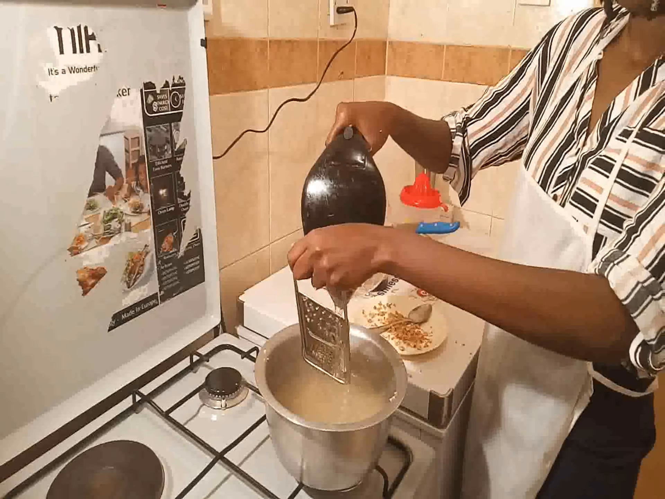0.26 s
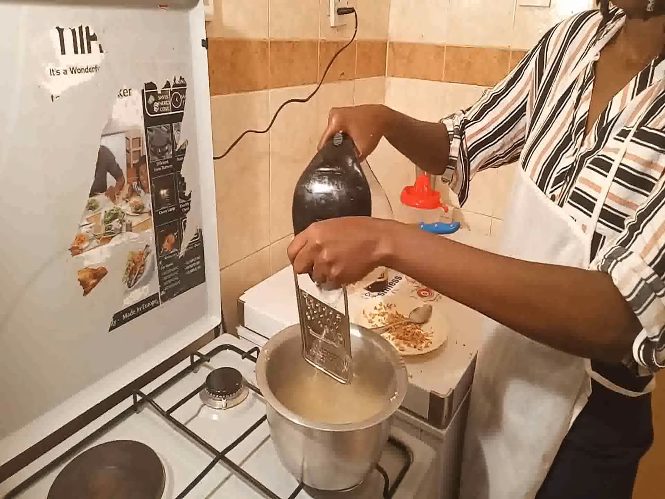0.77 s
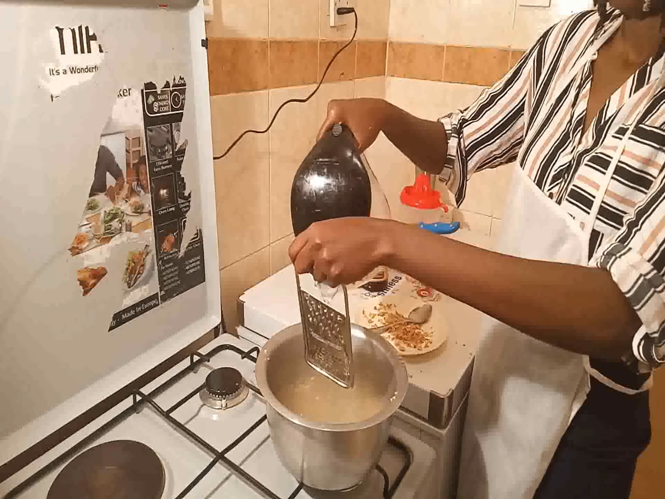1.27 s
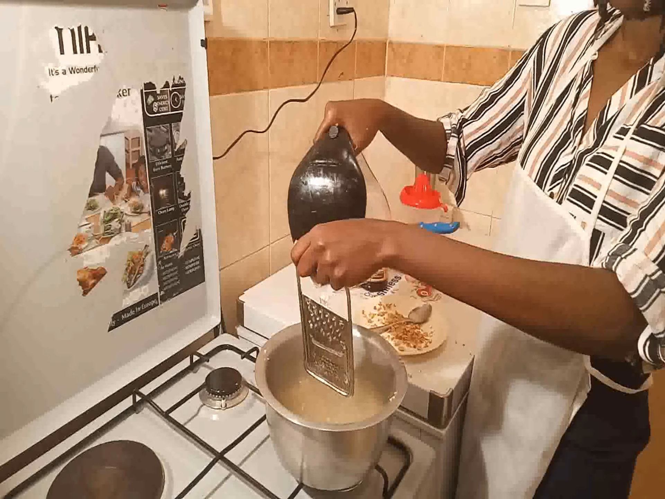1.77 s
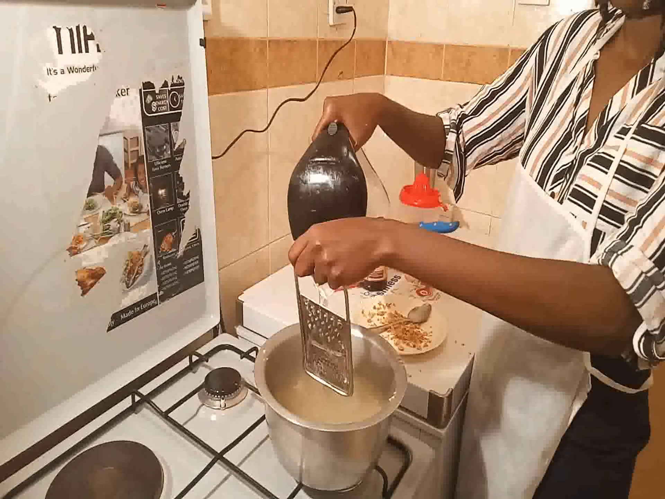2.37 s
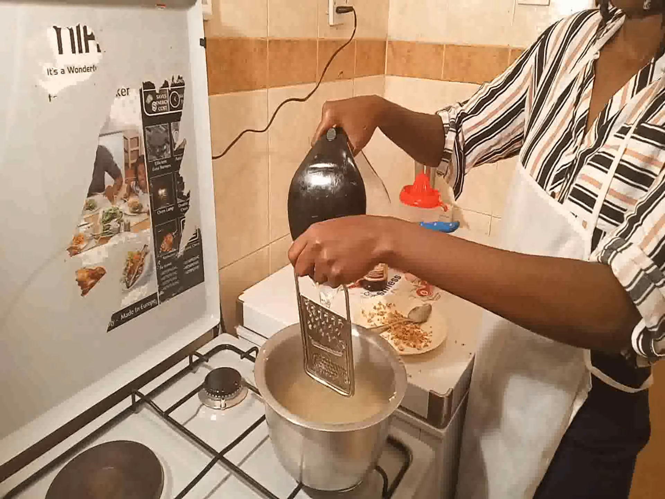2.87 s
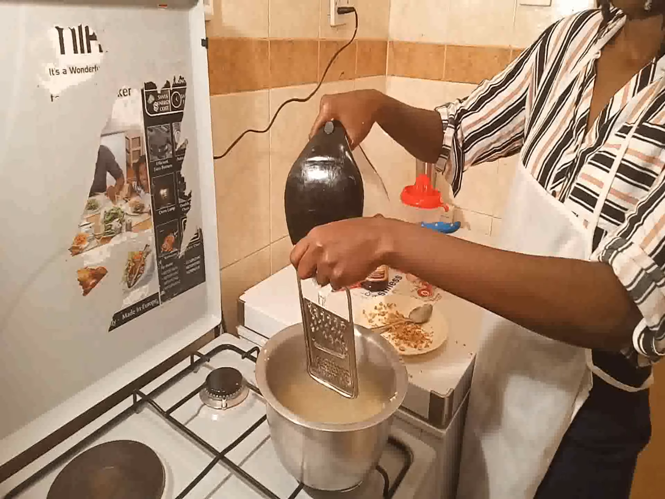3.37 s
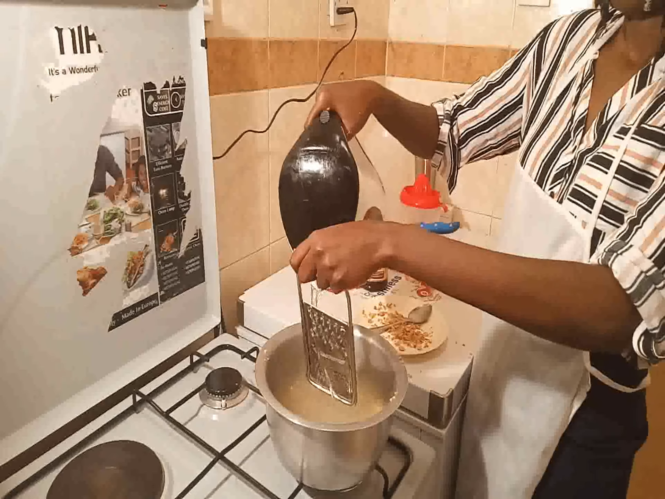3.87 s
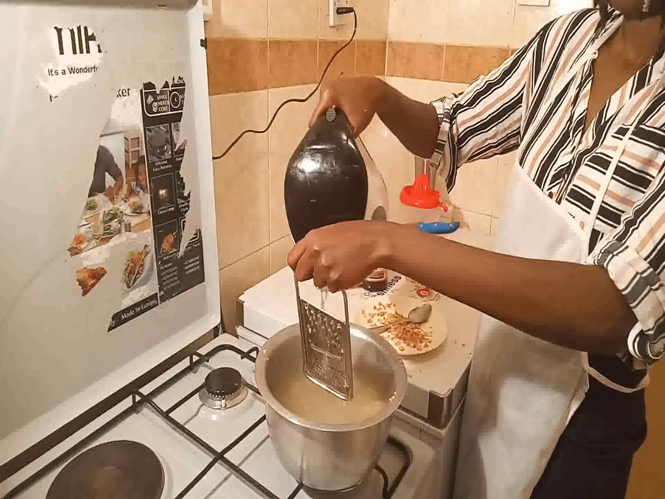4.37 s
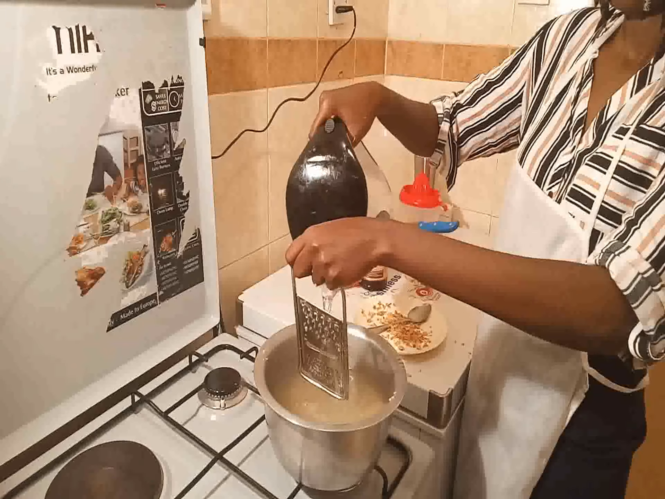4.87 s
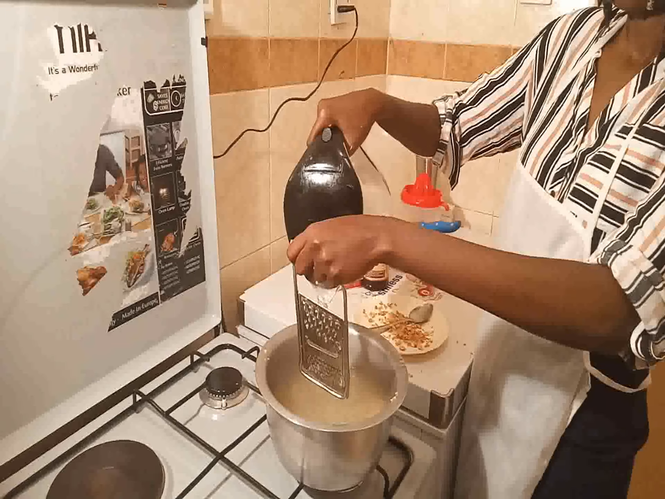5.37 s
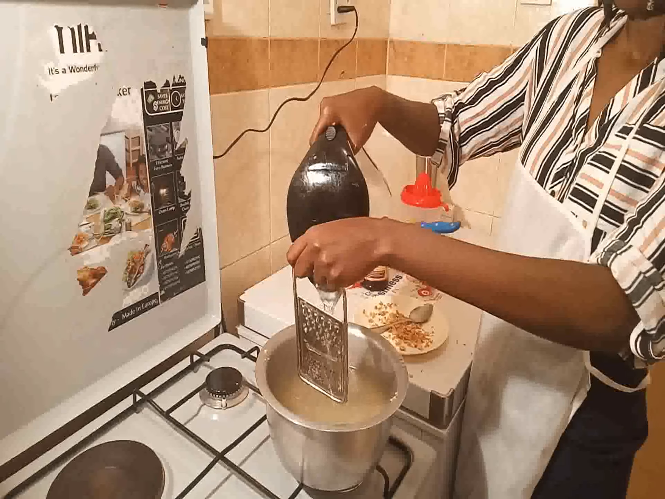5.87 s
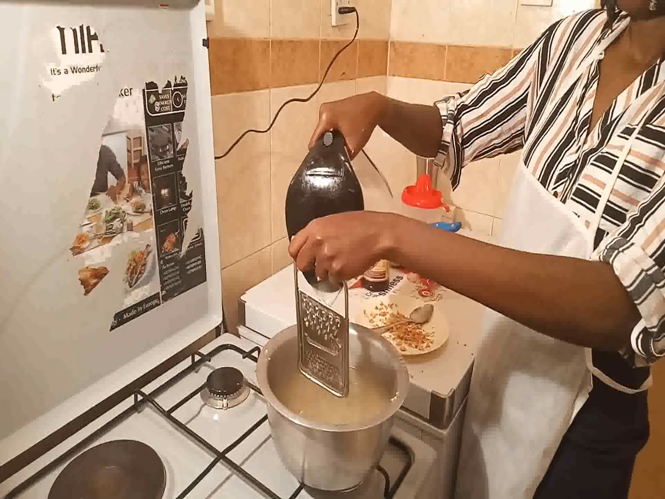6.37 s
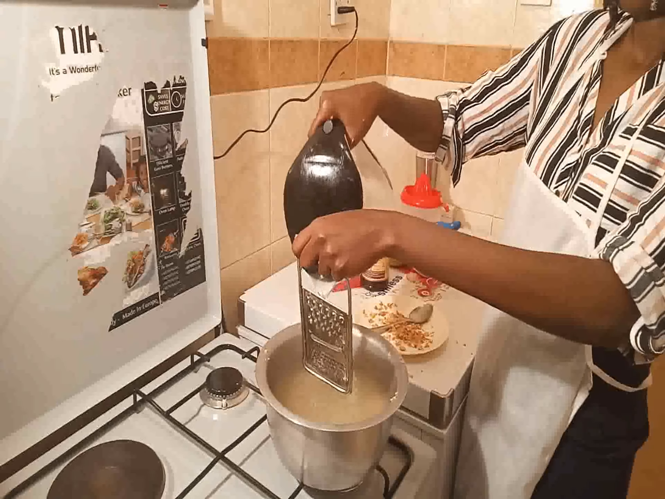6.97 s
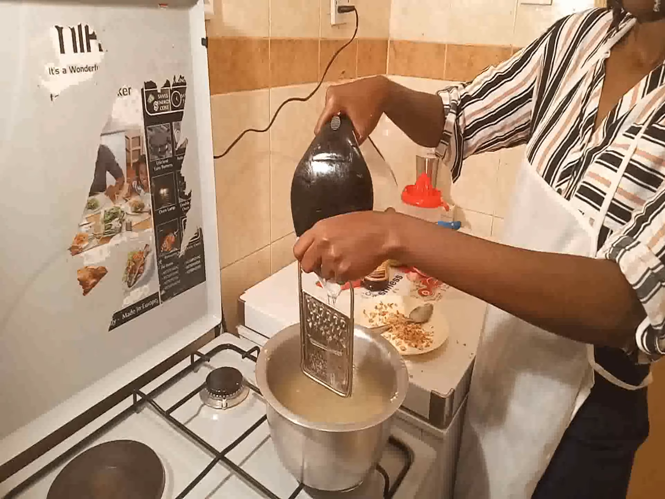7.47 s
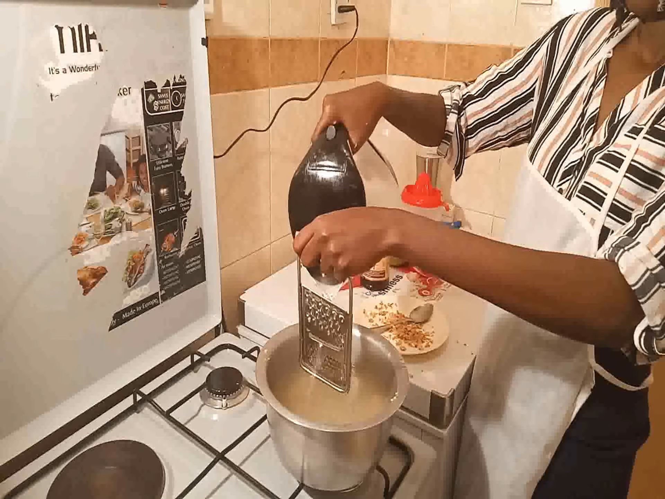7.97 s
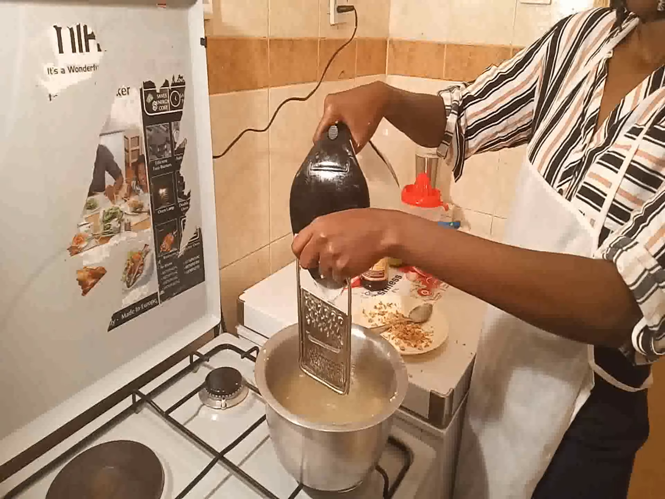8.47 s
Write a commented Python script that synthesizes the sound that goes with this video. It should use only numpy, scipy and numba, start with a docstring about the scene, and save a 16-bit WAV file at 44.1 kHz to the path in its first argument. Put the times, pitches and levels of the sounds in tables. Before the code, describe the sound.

In a small tiled kitchen, water from an upturned bottle runs down a metal grater into a half-full pot. It starts busy, with dense gurgling bubbles and splashes, then comes in irregular slugs separated by brief lulls, growing sparser toward the end. Drops tick sharply and the pot rings briefly. A close, dull phone microphone adds a low wavering rumble and thin hiss.

```python
"""A small tiled kitchen: water glugs from an upturned bottle, trickles down a grater and drops into a half-full
metal pot. Trapped bubbles are short sines gliding upwards; some run together as gurgles whose pitch slides.
Swarms of small bubbles and a crackle of spray swell with each slug of water; single drops tick sharply. Pot
modes, tile echo and singing notes ring on, over a wavering rumble and a thin hiss. A dull phone microphone
colours it all, a noise suppressor trims the tails and the top is cut."""
import sys
import numpy as np
from scipy import signal
from scipy.fft import rfft, irfft, next_fast_len
from scipy.io import wavfile
from scipy.ndimage import uniform_filter1d
from numba import njit

SR = 44100
rng = np.random.default_rng(int(sys.argv[2]) if len(sys.argv) > 2 else 0)


def unload_audio(sound):
    """Save the sound as a 16-bit wav file, at the path given as the first command line argument."""
    columns = np.transpose(np.atleast_2d(sound))
    # keep every value between -1 and 1, then stretch to whole-number steps
    steps = np.round(np.clip(columns, -1, 1) * 32767)
    wavfile.write(sys.argv[1], SR, steps.astype(np.int16))


N = 385345  # length in samples

# response of the phone microphone: (frequency [Hz], level [dB])
MICROPHONE = [(100, -1.5), (3500, 12), (4400, 7), (5500, -2), (7000, -1.5), (9500, -12.5), (12000, -17.5),
              (12500, -23)]

BUBBLE_GLIDE = 0.0012  # fraction by which the pitch rises per cycle
BUBBLE_RISE_CYCLES = 0.47  # time constant of the swell
LARGEST_DB = 12  # ceiling on the random sizes of small bubbles and spray


def undb(db):
    """Turn decibels into an amplitude factor."""
    return 10 ** (np.asarray(db) / 20)


def level(x, db):
    """Set the RMS level of a sound."""
    return x * undb(db) / np.sqrt(np.mean(x ** 2))


def read(points, hz):
    """Read a spectrum in dB at given frequencies, straight lines over log frequency."""
    at, db = np.transpose(points)
    return np.interp(np.log(np.maximum(hz, 1)), np.log(at), db)


def colour(x, points):
    """Weight a sound by a spectrum."""
    size = next_fast_len(N + 4096)
    hz = np.arange(size // 2 + 1) * SR / size
    weighted = rfft(x, size) * undb(read(points, hz))
    return irfft(weighted, size)[..., :N]


def highpass(x, order, hz):
    """Remove what lies below a frequency."""
    return signal.sosfilt(signal.butter(order, hz, "high", fs=SR, output="sos"), x)


def walk(rate):
    """Random levels, `rate` new ones per second, slewed from one to the next; spread near 1."""
    hold = int(SR / rate)
    steps = np.repeat(rng.standard_normal(N // hold + 1), hold)
    return uniform_filter1d(steps, hold)[:N] / np.sqrt(2 / 3)


@njit
def plink(s, size, hz, cycles, glide, rise):
    """Decaying sines that swell at once; a bubble's pitch glides up as it nears the surface.

    The amplitude falls by e every cycles / 2 turns, while the swell takes `rise` turns.
    """
    out = np.zeros(N)
    for k in range(len(s)):
        turn = -(s[k] * SR % 1) * hz[k] / SR  # phase in cycles, starting between samples
        step = hz[k] / SR
        for i in range(int(s[k] * SR) + 1, N):
            turn += step
            step = min(step * (1 + glide * step), .4)
            swell = 1 - np.exp(-turn / rise)
            decay = np.exp(-2 * turn / cycles[k])
            out[i] += size[k] * swell * decay * np.sin(2 * np.pi * turn)
            if turn > 3.5 * cycles[k]:
                break
    return out


def wavering_rumble():
    """Low noise that follows a drawn level curve and wavers at random on top."""
    # spectrum of the rumble, as density: (frequency [Hz], level [dB])
    rumble_colour = [(25, -32), (60, -13.5), (100, 0.5), (130, 2.5), (180, -7.5), (250, -23.5), (600, -38),
                     (2000, -84)]
    # swells and dips before the microphone: (time [s], level [dB])
    rumble_curve = [(0.0, -52.5), (0.41, -65), (0.44, -69), (0.51, -57.5), (2.11, -59), (2.29, -72),
                    (2.46, -61), (2.55, -83), (2.82, -61.5), (2.97, -69), (3.02, -58), (3.11, -66.5),
                    (3.53, -54.5), (3.62, -90), (3.72, -56.5), (3.89, -80), (3.94, -60), (4.62, -63),
                    (5.28, -57.5), (5.47, -71), (6.33, -59.5), (6.38, -53), (6.47, -71), (6.57, -59),
                    (6.64, -79), (6.84, -58), (6.89, -74.5), (7.96, -60), (8.18, -73), (8.74, -58)]
    flicker_db = 1.2
    waver = undb(flicker_db * walk(16))
    s, db = np.transpose(rumble_curve)
    curve_db = np.interp(np.arange(N) / SR, s, db)
    rumble = colour(rng.standard_normal(N), rumble_colour) * waver
    return level(rumble, 0) * undb(curve_db)


def steady_rumble():
    """Low noise at one constant level."""
    # spectrum of the rumble, as density: (frequency [Hz], level [dB])
    steady_colour = [(25, -8.5), (60, 3), (180, -6.5), (300, -10.5), (600, -13.5), (2000, -81)]
    return level(colour(rng.standard_normal(N), steady_colour), -66.5)


def hiss():
    """Thin noise whose level flickers at random."""
    # spectrum of the hiss, as density: (frequency [Hz], level [dB])
    hiss_colour = [(800, 3), (3000, -2), (8000, 0)]
    flicker_db = 1.5
    noise = colour(rng.standard_normal(N), hiss_colour)
    return level(noise * undb(flicker_db * walk(11)), -62.5)


def modes(t):
    """Decaying sines at the notes that pot and kitchen ring with, in random phase."""
    # modes, levels relative to each other: (frequency [Hz], level [dB], t60 [s])
    ring = [(364, -8.5, 0.96), (434, -17, 0.39), (523, -0.5, 0.83), (632.5, -4, 0.22), (662.4, 0.5, 0.33),
            (770, -1, 0.17), (795.3, 6.5, 0.16), (870, -10, 0.28), (960, 14, 0.28), (963, -16.5, 0.61),
            (1020, -0.5, 0.45), (1198, 1, 0.26), (1234, -6.5, 0.48), (1346, -22.5, 0.097), (1436, 1, 0.25),
            (1382, 15, 0.11), (1700, 16, 0.082), (1435, -24, 0.088), (1775, 7, 0.056), (1989, 3, 0.46),
            (2290, -5, 0.085), (2403, -14, 0.5), (2336, 7, 0.34), (2464, -1.5, 0.11), (2500, -4, 0.13),
            (3500, -17, 0.37), (583, 5.5, 0.38), (1110, -1, 0.62), (1301, 8, 0.16), (1446, -4, 0.45)]
    echo = 0
    for hz, db, t60 in ring:
        tone = np.sin(2 * np.pi * (hz * t + rng.random()))
        echo = echo + undb(db) * tone * 1000 ** (-t / t60)
    return level(echo, -7.5)


def tiles(t):
    """Dense echo of the tiled walls: bands of noise, each dying at its own pace."""
    # echo bands before the shared soft onset: (low [Hz], high [Hz], level [dB], t60 [s])
    tile_bands = [(229, 1240, -9, 0.45), (1370, 6360, -2, 0.32), (5050, 20400, -11, 0.22)]
    echo = 0
    for low_hz, high_hz, db, t60 in tile_bands:
        band_filter = signal.butter(2, (low_hz, high_hz), "band", fs=SR, output="sos")
        band = signal.sosfilt(band_filter, rng.standard_normal(SR))
        echo = echo + level(band * 1000 ** (-t / t60), db)
    return echo


def kitchen(x):
    """The direct sound plus one second of modes, tile echo and single early reflections."""
    # the nearest surfaces answer singly: (delay [s], level [dB])
    first_echoes = [(0.0033, -9), (0.0076, -10), (0.0162, -8)]
    onset_s, pot_low_hz = 0.0053, 315
    t = np.arange(SR) / SR
    echo = modes(t) + tiles(t)
    echo = echo * (1 - np.exp(-(t / onset_s) ** 2))  # the echo builds up over some milliseconds
    echo = echo / np.sqrt(SR)  # from RMS level to the energy of the whole second
    for s, db in first_echoes:
        echo[int(s * SR)] += undb(db)
    wet = x + signal.fftconvolve(x, echo)[:N]
    return highpass(wet, 4, pot_low_hz)  # a pot this small radiates no bass


def singing():
    """Single notes of the pot wall that outlast a splash: sines of fixed pitch with long decays."""
    # notes, level nominal at the microphone: (time [s], level [dB], pitch [Hz], t60 [s])
    notes = [(0.37, -47, 573, 0.43), (0.535, -38, 1318, 1.2), (1.19, -47.5, 1293, 0.55),
             (1.245, -56, 581, 1.6), (4.035, -47, 2317, 0.75), (3.81, -30.5, 633, 0.23),
             (4.147, -34, 639, 0.24), (4.2, -48.5, 369, 0.52), (4.3, -63.5, 1094, 3.1),
             (4.38, -65, 2300, 0.52), (4.475, -58, 1650, 0.26), (5.9, -52, 2450, .5),
             (8.312, -53, 1120, 0.25), (8.55, -64, 1122, 2.7)]
    s, db, hz, t60 = np.array(notes, float).T.copy()
    cycles = 2 * hz * t60 / np.log(1000)
    return plink(s, undb(db - read(MICROPHONE, hz)), hz, cycles, 0., 8.5)


def flow(share, sprays, offset_db, swell, fade, dribble_db):
    """Gain that swells to the crest of each slug and fades to a dribble, slopes in dB per second.

    It follows the spray, or else a mix of small and large bubbles with `share` for the large.
    """
    # slugs landing in the pot: (crest time [s], large bubbles [dB], small bubbles [dB], spray [dB])
    slugs = [(0.0, -46, -49.5, -71.5), (0.09, -45, -55, -74.5), (0.39, -52, -56, -74.5),
             (0.531, -42.5, -77, -71), (0.75, -52.5, -54.5, -74), (0.87, -47, -72, -73.5),
             (1.12, -59.5, -60.5, -82), (1.624, -46.5, -54.5, -73), (2.0, -80, -60.5, -96),
             (2.25, -98, -66, -102), (2.55, -87, -49.5, -75.5), (2.72, -42.5, -56.5, -75),
             (2.82, -43.5, -63, -78), (2.92, -54, -57, -73.5), (3.2, -66, -58, -80.5),
             (3.43, -70, -63.5, -80.5), (3.76, -46, -53, -73), (3.97, -55, -63.5, -78),
             (4.108, -46.5, -62, -79), (4.4, -85, -87, -101), (4.649, -58, -56, -79),
             (4.78, -57, -77, -72.5), (4.955, -53.5, -50.5, -70.5), (5.13, -87, -55, -82),
             (5.3, -71, -54.5, -78), (5.42, -55, -60, -74), (5.74, -61.5, -63.5, -77.5),
             (6.06, -66, -52.5, -71.5), (6.251, -48, -54, -75), (6.42, -54.5, -57.5, -77.5),
             (6.6, -56, -71, -95), (6.91, -64, -69.5, -84), (7.05, -89, -80, -83), (7.3, -89, -86, -91),
             (7.49, -101, -56.5, -78), (7.64, -53, -60, -78.5), (7.93, -86, -70, -79),
             (8.32, -78, -66, -102), (8.45, -91, -83, -79.5), (8.72, -83, -76, -98)]
    s, large_db, small_db, spray_db = np.transpose(slugs)[:, :, None]
    t = np.arange(0, N + 256, 256) / SR
    if sprays:
        crest_db = spray_db + offset_db
    else:
        crest_db = small_db + np.clip(share, 0, 1) * (large_db - small_db) + offset_db
    db = crest_db - np.where(t < s, swell * (s - t), fade * (t - s))
    power = undb(2 * db).sum(axis=0) + undb(2 * dribble_db)
    return np.interp(np.arange(N) / SR, t, np.sqrt(power))


def random_sizes(luck, scatter_db):
    """Amplitudes of a random crowd: many small, few large."""
    return undb(np.minimum(-scatter_db * np.log(1 - luck), LARGEST_DB))


def ticks():
    """Drops slapping the surface: short bursts of noise, the loud ones placed in a crackle of spray."""
    # loud drops, before slap noise and high-pass: (time [s], level [dB])
    loud_drops = [(0.186, -35), (0.274, -39), (0.3192, -38), (0.4604, -60), (0.5207, -39), (0.5742, -31),
                  (0.6944, -43), (0.7111, -32), (0.874, -30.5), (0.985, -34), (1.084, -59), (1.2903, -41),
                  (1.4284, -36.5), (1.5384, -41), (1.551, -39), (1.6427, -61), (2.0174, -44), (1.916, -56),
                  (2.008, -58), (2.27, -59), (2.2965, -51), (2.376, -65), (2.498, -38.5), (2.6, -33.5),
                  (2.6823, -42), (2.786, -43), (2.999, -50), (3.071, -52), (3.134, -45), (3.179, -46),
                  (3.2843, -43), (3.4088, -46), (3.5738, -66), (3.7036, -39), (3.902, -56), (3.979, -50),
                  (3.9973, -32), (4.1903, -41), (4.581, -40), (4.7541, -51), (5.0465, -41), (5.222, -37),
                  (5.44, -40), (5.7799, -32.5), (6.0053, -39), (6.1684, -63), (6.331, -35), (6.6, -37),
                  (6.833, -54), (6.8663, -35), (7.012, -52), (7.1172, -55), (7.1538, -33), (7.254, -50),
                  (7.345, -49), (7.421, -48), (7.445, -40.5), (7.6036, -40.5), (8.1345, -41.5),
                  (8.2831, -58), (8.3952, -40)]
    crackle_per_s, scatter_db = 120, 6
    decay_s, low_hz = 0.00063, 2410
    when, luck = rng.random((2000, 2)).T
    used = np.arange(len(when)) < crackle_per_s * N / SR
    landings = np.zeros(N)
    landings[(when * N).astype(int)] = used * random_sizes(luck, scatter_db)
    landings = level(landings, 0) * flow(
        share=0, sprays=True, offset_db=1.9, swell=81, fade=133, dribble_db=-94.5)
    s, db = np.transpose(loud_drops)
    landings[(s * SR).astype(int)] = undb(db)
    decay = np.exp(-np.arange(256) / SR / decay_s)
    envelope = signal.fftconvolve(landings, decay)[:N]
    slaps = envelope * np.sign(rng.standard_normal(N))
    return highpass(slaps, 2, low_hz)


def swarms():
    """Random small bubbles in four ranges of pitch, each swarm following the flow."""
    # swarms: (lowest [Hz], highest [Hz], bubbles [1/s], ring [cycles], size scatter [dB],
    # share following the large bubbles [0-1], follows the spray [yes/no], offset [dB],
    # swell [dB/s], fade [dB/s], dribble between slugs [dB])
    swarm_table = [(558, 1158, 65, 13, 2.5, 0.98, False, -3.5, 207, 157, -100),
                   (1066, 1796, 100, 10, 2.5, 0.31, False, 1, 113, 64, -75),
                   (1970, 4300, 200, 4.4, 3.5, 0.14, False, 1.5, 112, 52, -78),
                   (5850, 13000, 350, 2.6, 1.5, 0.05, True, -2, 132, 54, -95.5)]
    out = 0
    for low_hz, high_hz, rate, cycles, scatter_db, *flow_shape in swarm_table:
        when, pitch, luck = rng.random((9000, 3)).T
        used = np.arange(len(when)) < rate * N / SR
        hz = low_hz * (high_hz / low_hz) ** pitch
        size = used * random_sizes(luck, scatter_db)
        swarm = plink(when * (N - 2) / SR, size, hz, cycles + 0 * hz, BUBBLE_GLIDE, BUBBLE_RISE_CYCLES)
        middle_hz = np.sqrt(low_hz * high_hz)
        out = out + level(swarm, -read(MICROPHONE, middle_hz)) * flow(*flow_shape)
    return out


def gurgles():
    """Runs of eight soft bubbles whose pitch slides from one size to another."""
    # runs, level nominal at the microphone:
    # (start [s], length [s], level [dB], from [Hz], to [Hz])
    runs = [(3.273, 0.14, -47, 590, 390), (3.355, 0.19, -51.5, 360, 256), (5.69, 0.1, -43, 1350, 600),
            (5.79, 0.11, -51, 566, 1150), (0.54, 0.16, -47.5, 408, 268), (0.88, 0.16, -49, 490, 300),
            (6.049, 0.3, -54.5, 335, 286), (4.5, 0.3, -52, 520, 400), (0.22, 0.11, -49.5, 560, 420)]
    spread, cycles, rise_cycles = 0.13, 4.7, 1.9  # spread: largest random detuning, as a fraction
    s, length, db, from_hz, to_hz = np.transpose(runs)[:, :, None]
    jitter, off = rng.random((len(runs), 2, 8)).transpose(1, 0, 2)
    along = (np.arange(8) + jitter) / 8
    hz = from_hz * (to_hz / from_hz) ** along * (1 + spread * (2 * off - 1))
    size = undb(db - read(MICROPHONE, hz)).ravel()
    when = (s + length * along).ravel()
    hz = hz.ravel()
    return plink(when, size, hz, cycles + 0 * hz, BUBBLE_GLIDE, rise_cycles)


def bubbles():
    """The bubbles that stand out, each a short sine; the lowest are gulps of air."""
    # bubbles, level nominal at the microphone: (time [s], level [dB], pitch [Hz])
    bubble_table = [(0.03, -26.5, 633), (0.05, -27, 1290), (0.089, -34, 1460), (0.112, -22.5, 1880),
                    (0.002, -22.5, 690), (0.015, -22, 4180), (0.061, -25.5, 845), (0.109, -21, 3060),
                    (0.132, -31.5, 602), (0.166, -29.5, 744), (0.184, -24, 1970), (0.235, -28, 1210),
                    (0.276, -24, 4100), (0.277, -19, 2370), (0.312, -30, 1680), (0.352, -27.5, 1280),
                    (0.377, -49, 590), (0.377, -29, 3960), (0.435, -28.5, 1130), (0.521, -24.5, 2210),
                    (0.525, -16, 1320), (0.527, -28, 1060), (0.5332, -26, 1280), (0.536, -36, 640),
                    (0.572, -44, 1320), (0.637, -40, 460), (0.549, -21, 3300), (0.556, -36.5, 455),
                    (0.596, -18.5, 3470), (0.655, -24.5, 1410), (0.674, -35, 805), (0.696, -33, 6900),
                    (0.714, -23.5, 1880), (0.723, -36.5, 760), (0.79, -38, 754), (0.874, -21.5, 1550),
                    (0.874, -19.5, 2170), (0.874, -23, 3070), (0.88, -28.5, 716), (0.899, -37, 534),
                    (0.911, -26, 1320), (0.963, -42, 490), (0.988, -21.5, 1450), (1.017, -44, 430),
                    (1.085, -32.5, 2650), (1.119, -31, 1550), (1.165, -38.5, 897), (1.231, -29, 1830),
                    (1.243, -49, 583), (1.254, -18.5, 3540), (1.29, -35.5, 6900), (1.382, -26.5, 1204),
                    (1.431, -27.5, 2280), (1.471, -26.5, 1046), (1.51, -42, 593), (1.538, -31, 3560),
                    (1.545, -25.5, 1100), (1.609, -42, 990), (1.643, -27.5, 766), (1.643, -44, 1920),
                    (1.68, -22.5, 1150), (1.709, -36, 785), (1.744, -44, 467), (1.791, -42, 528),
                    (1.854, -51, 334), (1.908, -33.5, 1800), (2.02, -32, 3480), (2.166, -36, 1670),
                    (2.283, -33.5, 2440), (2.3941, -18, 3440), (2.3941, -29.5, 2570), (2.404, -38, 1090),
                    (1.942, -55, 8050), (1.972, -37, 1430), (2.08, -52, 6500), (2.1815, -51, 7850),
                    (2.282, -58, 5500), (2.165, -36, 2500), (2.483, -27, 2930), (2.514, -25.5, 3220),
                    (2.516, -30.5, 1690), (2.599, -32.5, 2730), (2.579, -31.5, 1320), (2.639, -46, 520),
                    (2.685, -29.5, 800), (2.706, -27, 1300), (2.733, -26, 687), (2.764, -25.5, 656),
                    (2.803, -30, 745), (2.82, -20.5, 2070), (2.821, -28, 830), (3.015, -39, 1747),
                    (3.179, -29, 3530), (3.292, -32.5, 1500), (3.235, -44, 2550), (3.574, -34, 1020),
                    (3.604, -34, 694), (3.622, -32.5, 1470), (3.7035, -28.5, 625), (3.7035, -28, 1960),
                    (3.7035, -32, 2900), (3.7035, -30.5, 960), (3.7035, -38, 1390), (3.746, -28.5, 1320),
                    (3.713, -33, 402), (3.762, -34.5, 384), (3.811, -31.5, 657), (3.811, -25.5, 3170),
                    (3.851, -39, 434), (3.903, -37.5, 8100), (3.983, -27, 1410), (3.994, -28, 3130),
                    (3.997, -29, 6860), (4.003, -36.5, 665), (4.034, -30.5, 2300), (4.036, -31, 770),
                    (4.098, -42.5, 357), (4.147, -34, 675), (4.191, -35, 6400), (4.194, -31, 1200),
                    (4.197, -49, 340), (4.224, -49, 1290), (4.245, -52, 3540), (4.2946, -37.5, 3130),
                    (4.303, -39, 750), (4.556, -27.5, 2900), (4.581, -25, 993), (4.602, -26.5, 1630),
                    (4.602, -48, 946), (4.629, -46.5, 504), (4.851, -29, 920), (4.852, -26.5, 1240),
                    (4.894, -22.5, 2720), (4.922, -26, 910), (4.967, -23.5, 3600), (5.025, -27, 1030),
                    (5.047, -27, 3630), (5.054, -39.5, 810), (5.216, -34.5, 1230), (5.225, -29, 3650),
                    (5.24, -23, 3250), (5.274, -29.5, 2150), (5.331, -27.5, 1026), (5.355, -46.5, 527),
                    (5.45, -48, 520), (5.393, -33, 853), (5.398, -27, 3020), (5.576, -43, 1250),
                    (5.647, -39, 1480), (5.684, -33.5, 3300), (5.726, -35, 1120), (5.779, -36, 4530),
                    (5.78, -25.5, 2680), (5.78, -15.5, 3300), (5.785, -33, 1100), (5.905, -34, 3900),
                    (5.95, -32, 2580), (5.966, -33, 1350), (5.998, -32, 4120), (6.014, -18.5, 2530),
                    (6.068, -33, 4600), (6.27, -39, 583), (6.378, -62, 543), (6.081, -28.5, 890),
                    (6.103, -34.5, 785), (6.11, -44, 546), (6.143, -33.5, 880), (6.205, -25, 986),
                    (6.228, -49, 600), (6.244, -21.5, 1990), (6.297, -33.5, 740), (6.331, -39, 607),
                    (6.332, -34, 6930), (6.364, -24.5, 3300), (6.477, -26, 1044), (6.52, -48, 515),
                    (6.526, -31.5, 1930), (6.6, -26.5, 1126), (6.618, -40.5, 571), (6.7, -37.5, 3160),
                    (6.826, -28, 3020), (6.833, -34, 6600), (6.849, -27, 1240), (6.9, -48.5, 804),
                    (7.012, -36, 6800), (7.051, -34.5, 2340), (7.118, -38.5, 5260), (7.1538, -36, 1630),
                    (7.1538, -17.5, 2460), (7.1538, -19, 3090), (7.1545, -34, 8050), (7.172, -46, 550),
                    (7.194, -25, 1580), (7.24, -49, 343), (7.418, -43, 3730), (7.446, -32, 2900),
                    (7.463, -38, 1280), (7.502, -30, 3130), (7.54, -33, 1130), (7.575, -32.5, 844),
                    (7.6, -26, 2430), (7.603, -22, 1150), (7.615, -41, 587), (7.626, -33.5, 830),
                    (7.676, -26, 2980), (7.889, -30, 3030), (7.779, -41, 4400), (7.8615, -47, 6240),
                    (7.9145, -35, 4240), (7.917, -25, 1244), (8.22, -37, 3960), (8.625, -62, 7800),
                    (7.953, -52, 1160), (8.012, -36, 3100), (8.069, -27.5, 2400), (8.123, -31.5, 1010),
                    (8.138, -27, 3830), (8.2, -35, 1550), (8.284, -42, 7760), (8.358, -47, 3400),
                    (8.396, -30.5, 1290), (8.43, -30, 1290), (8.395, -33.5, 1950), (8.42, -30, 797),
                    (8.475, -56, 780)]
    cycles_at_1k, cycles_power = 4.36, 0.0029  # nearly the same count of cycles at every pitch
    s, db, hz = np.array(bubble_table, float).T.copy()
    cycles = cycles_at_1k * (hz / 1000) ** cycles_power
    return plink(s, undb(db - read(MICROPHONE, hz)), hz, cycles, BUBBLE_GLIDE, BUBBLE_RISE_CYCLES)


def scene():
    """Bubbles and drops excite pot and kitchen; singing notes and background are added dry."""
    water = bubbles() + gurgles() + swarms() + ticks()
    background = wavering_rumble() + steady_rumble() + hiss()
    return (kitchen(water) + singing() + background)[None]


def suppress(x):
    """Noise suppressor: bands weak for a moment are turned down, so tails end early and strong lines last."""
    # what it takes for noise: (frequency [Hz], level [dB])
    noise_guess = [(100, -73.5), (300, -80), (700, -66.5), (1200, -79), (3000, -79.5), (6000, -89.5),
                   (12000, -110)]
    floor_db = -9.5  # the most it turns a band down
    hz, _, bands = signal.stft(x, SR, nperseg=1024, noverlap=768)
    power = uniform_filter1d(np.abs(bands) ** 2, size=3, axis=-1) + 1e-18
    share = 1 - undb(2 * read(noise_guess, hz))[:, None] / power
    gain = np.sqrt(np.maximum(share, undb(2 * floor_db)))
    return signal.istft(bands * gain, SR, nperseg=1024, noverlap=768)[1][..., :N]


def record(dry):
    """The microphone lifts the presence range and dulls the treble; noise is suppressed, the top cut."""
    top_hz = 13660
    heard = suppress(colour(dry, MICROPHONE))
    return signal.sosfilt(signal.ellip(10, .2, 70, top_hz, fs=SR, output="sos"), heard)


dry = scene()
out = record(dry)
unload_audio(out)
```